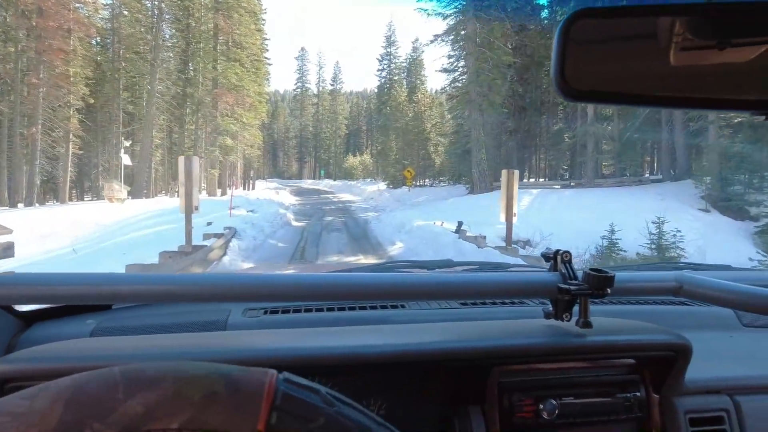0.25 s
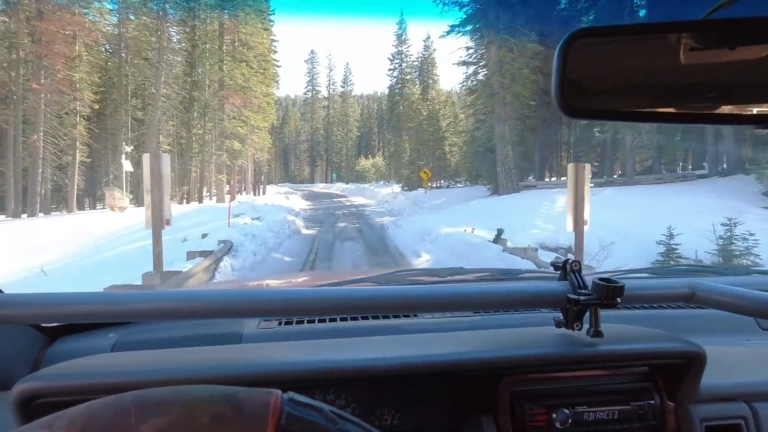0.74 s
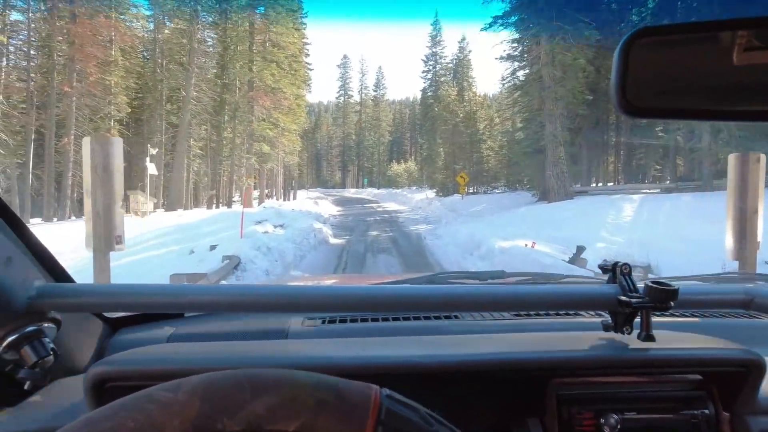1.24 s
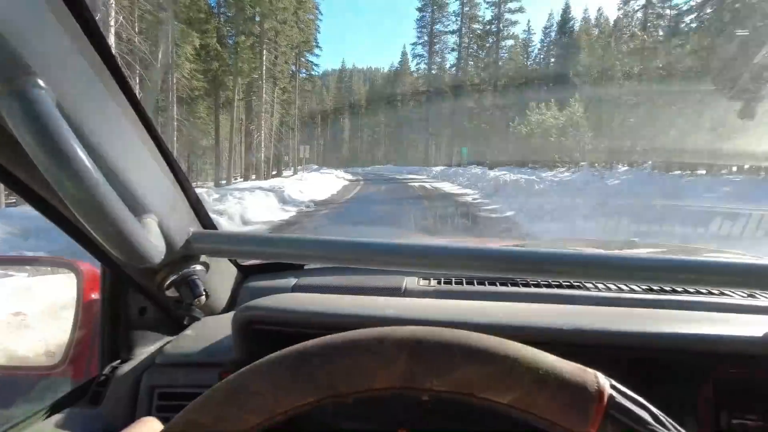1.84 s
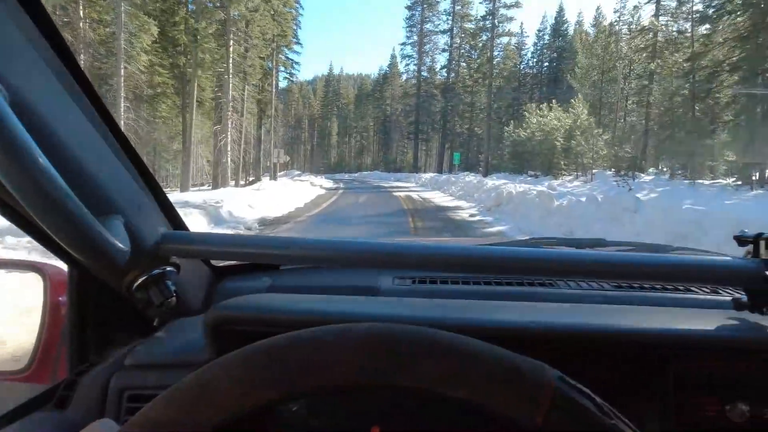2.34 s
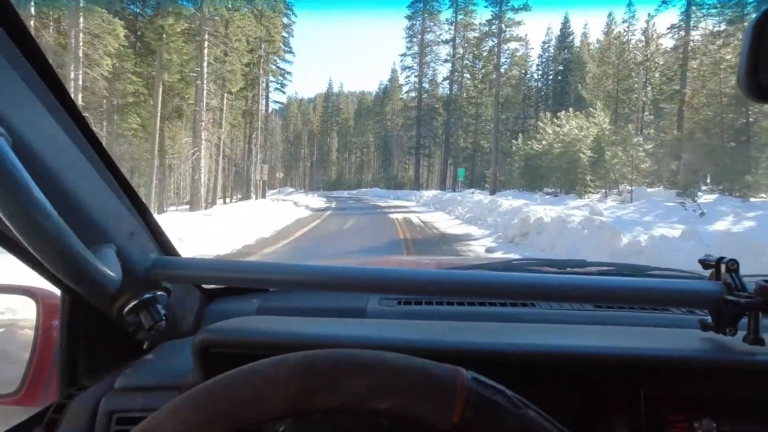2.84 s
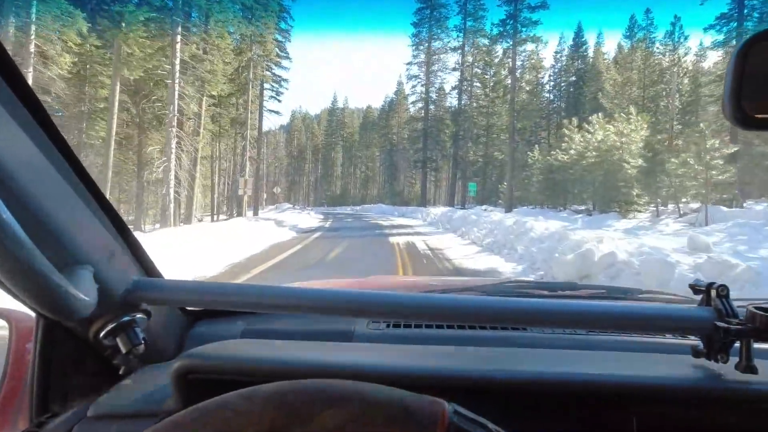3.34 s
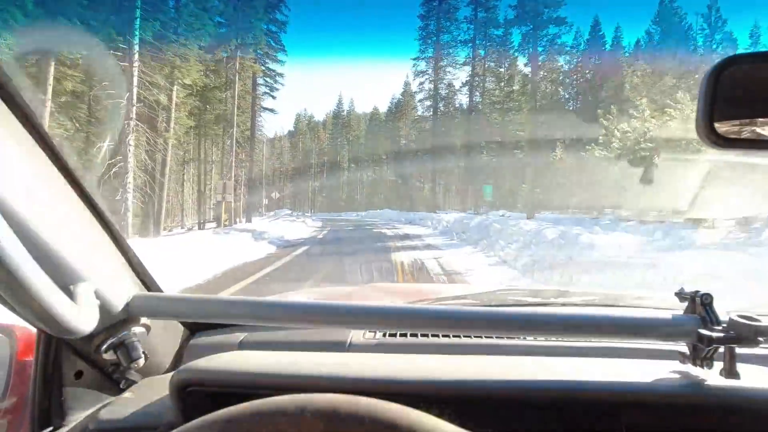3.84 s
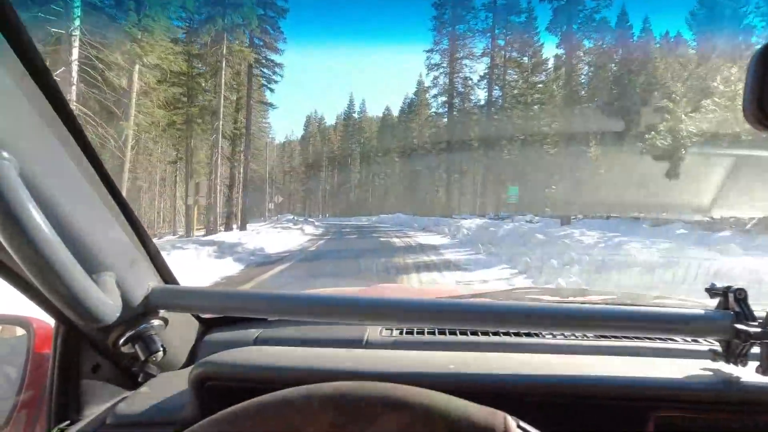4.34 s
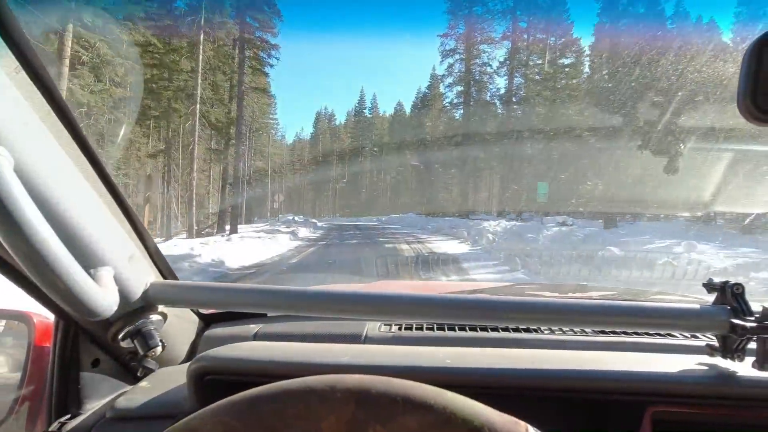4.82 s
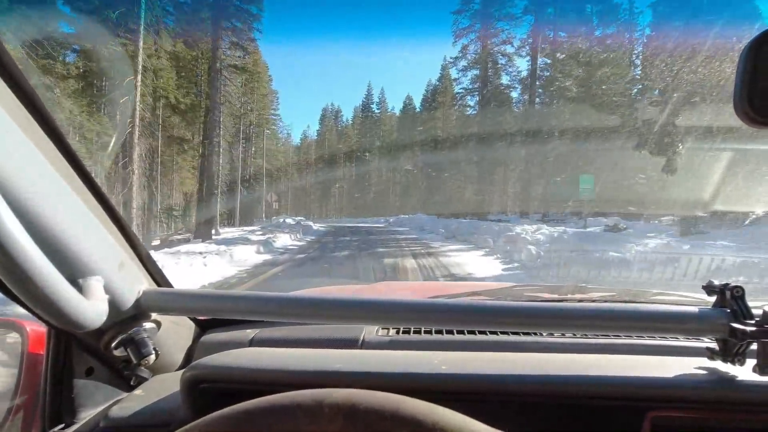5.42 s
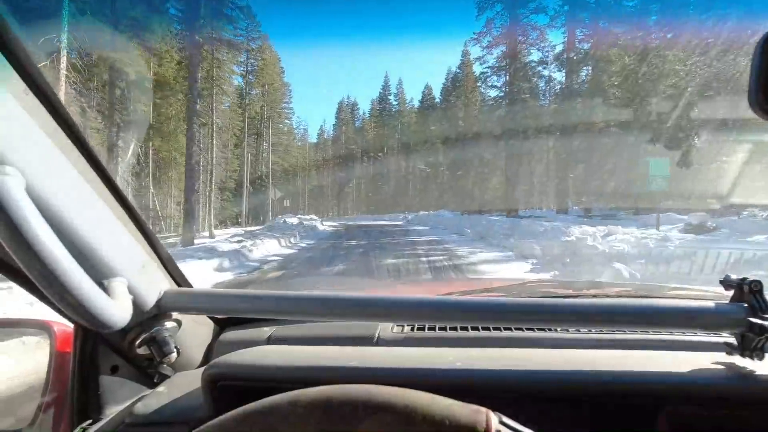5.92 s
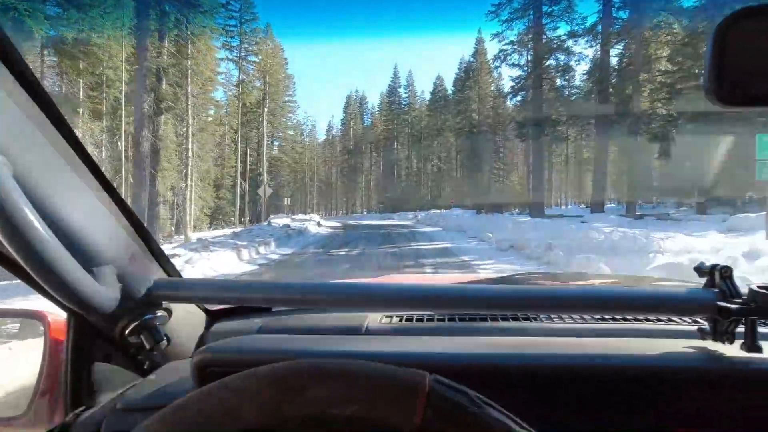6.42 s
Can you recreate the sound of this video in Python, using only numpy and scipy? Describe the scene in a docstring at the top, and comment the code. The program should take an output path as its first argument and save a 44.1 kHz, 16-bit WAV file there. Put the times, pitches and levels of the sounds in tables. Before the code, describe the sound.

Stereo microphones in the cab, close and padded. First, quiet crunchy hiss, low rumble and high squeaks on snow, with a few bumps. Then a sudden switch to pavement: a heavy bump, loud low humming drone surging and dropping, rapid track throbbing, gritty roar, small rattles and floor clunks. The truck speeds up towards the end, and the boom stays strong.

```python
"""Hiss and thin squeaks come first, from inside a truck on rubber snow tracks on packed snow; then the
sound cuts abruptly to the truck on bare paved road, where it gathers speed and the cab booms in swells.
Cleats thump on the road and the drive lugs, three to a cleat, set the cab booming; the engine hums.
Shaped noise makes the rumble, roar, grit and spray; narrow resonances make clunks, buzzes and squeaks.
"""
import sys
import numpy as np
from scipy import signal
from scipy.fft import rfft, irfft, next_fast_len
from scipy.io import wavfile
from scipy.ndimage import uniform_filter1d, map_coordinates

SR = 44100
rng = np.random.default_rng(int(sys.argv[2]) if len(sys.argv) > 2 else 0)


def wrap_up_sound(samples):
    """Save the sound to the file named by the first command line argument, as 16-bit audio."""
    columns = np.atleast_2d(samples).T
    # keep every value between -1 and 1, then stretch to whole-number steps
    tamed = np.clip(columns, -1, 1)
    steps = np.round(tamed * 32767).astype(np.int16)
    wavfile.write(sys.argv[1], SR, steps)


N = 294147

# the sound cuts abruptly from a truck on packed snow to the truck on bare road
ROAD_S, ROAD_RISE_S = 1.335, 0.03


def amp(db):
    """Decibels to gain."""
    return 10 ** (np.asarray(db) / 20)


def unit(x):
    """Scale to rms 1."""
    return x / np.sqrt(np.mean(x ** 2) + 1e-20)


def along(points, hz):
    """Read (f/Hz, value) points on a log frequency axis."""
    f, v = np.transpose(points)
    return np.interp(np.log(hz + 1), np.log(f + 1), v)


def wobble(rate):
    """A smooth random curve, rate knots a second."""
    knots = rng.standard_normal(int(N * rate / SR) + 4)
    return map_coordinates(knots, [np.arange(N) * rate / SR])


def filtered(x, response):
    """Pass x through a complex response of frequency."""
    m = next_fast_len(N + SR // 2)
    return irfft(rfft(x, m) * response(np.fft.rfftfreq(m, 1 / SR)), m)[..., :N]


def spread(pair, response):
    """Colour two unrelated signals and mix them to the two microphones, rms 1."""
    # likeness of the left and right microphones: f/Hz, coherence
    alike = [(60, 0.99), (150, 1), (300, 0.98), (550, 0.97), (1000, 0.86), (2000, 0.32), (4000, -0.26),
             (8000, 0.014), (12000, -0.066)]

    def mix(hz):
        turn = np.arccos(np.clip(along(alike, hz), -1, 1)) / 2
        return response(hz) * np.array([np.cos(turn), np.sin(turn)])

    mid, side = filtered(pair, mix)
    return unit(np.array([mid + side, mid - side]))


def patchy(depth_db):
    """Two noises whose colour shifts from moment to moment."""
    z = signal.stft(rng.standard_normal((2, N)), nperseg=512)[2]
    field = uniform_filter1d(rng.standard_normal(z.shape[1:]), size=5, axis=0)
    field = uniform_filter1d(field, size=10, axis=1)
    return unit(signal.istft(z * amp(depth_db * unit(field)), nperseg=512)[1][:, :N])


def narrow(pitch_hz, width_hz):
    """A fuzzy friction tone at both microphones, rms 1."""
    return spread(rng.standard_normal((2, N)), lambda hz: 1 / (1 + ((hz - pitch_hz) / width_hz) ** 2))


def order(turns, rough, flutter):
    """A line of rms 1 that follows a rotation and flutters in size and phase."""
    sway = 1 + rough * (wobble(flutter) + 1j * wobble(flutter))
    return unit(np.real(sway * np.exp(2j * np.pi * turns)))


def onset(s, rise_s):
    """Rises from 0 to 1, starting at s."""
    return np.clip((np.arange(N) / SR - s) / rise_s, 0, 1)


def swell(s, length):
    """A rounded hump of height 1."""
    return np.abs(np.sin(np.pi * np.clip((np.arange(N) / SR - s) / length, 0, 1))) ** 0.29


def surge(s, length, crest, attack_s, release_s, sag_db):
    """A resonance catches, builds to its crest, sags by sag_db per second squared and lets go."""
    sag = amp(-sag_db * (np.arange(N) / SR - crest) ** 2)
    return onset(s, attack_s) * (1 - onset(s + length - release_s, release_s)) * sag


def bounded_grain(width_hz):
    """A random phasor for a narrow resonance: its size is held in bounds, its phase wanders."""
    grain = wobble(2 * width_hz) + 1j * wobble(2 * width_hz)
    return grain / np.sqrt(1 + np.abs(grain) ** 2)


def rubs(rows, width_hz):
    """Short bouts of shaking or friction, each in a narrow resonance."""
    t = np.arange(N) / SR
    grain = bounded_grain(width_hz)
    out = np.zeros(N)
    for s, length, hz, db in rows:
        tone = unit(np.real(grain * np.exp(2j * np.pi * hz * t)))
        out += amp(db) * swell(s, length) * tone
    return out


def knocks(rows, t60_s, width_hz):
    """Sharp blows, each dying away in a broad resonance."""
    t = np.arange(N) / SR
    grain = bounded_grain(width_hz)
    out = np.zeros(N)
    for s, db, hz in rows:
        decay = amp(db - 60 * np.maximum(t - s, 0) / t60_s)
        tone = unit(np.real(grain * np.exp(2j * np.pi * hz * t)))
        out += decay * onset(s, rise_s=.0015) * tone
    return out


def from_right(x, lag_ms):
    """A wave that reaches the left microphone a little later than the right."""
    sides = np.array([[-1], [1]])
    return filtered(x, lambda hz: np.exp(1j * np.pi * hz * lag_ms / 1000 * sides))


def roughness():
    """Extra dB of rumble, roar, grit and spray as the tracks cross rough, gritty stretches."""
    # rough stretches: middle t/s, width/s, then added rumble/dB, roar/dB, grit/dB, spray/dB
    stretches = [(.2, 0.37, -1, 0, 2, 1), (1.15, 0.19, 0, -2, 2.5, 1.5), (1.7, .3, 1, 1.5, 0.5, 0),
                 (2.17, .09, 1.5, 1.5, 2, 3), (2.69, .05, 1, -0.5, 2, 3), (2.85, 0.7, 1, 0, 1.8, 2.5),
                 (3.33, .06, 0, 0.5, -2, -3), (3.57, 0.14, -1, 6.5, 3.5, 1.5), (4.22, 0.36, 3, 3.5, 4.5, 5),
                 (6.062, 0.11, 3.5, 7, 4, 3), (6.549, 0.12, -1, 4.5, 2.5, 3)]
    t = np.arange(N) / SR
    return sum(np.outer(dbs, np.exp(-((t - s) / width) ** 2)) for s, width, *dbs in stretches)


def squeaks():
    """Dry joints stick and slip, and a bearing whines, each in a narrow band of friction noise."""
    # thin metallic squeals: start t/s, length/s, crest t/s, level/dB
    squeals = [(.24, .27, 0.39, -66), (.95, .215, 1.2, -62.5), (1.19, 0.16, 1.3, -57)]
    # resonances of the squealing joint: f/Hz, width/Hz, relative level/dB
    squeal_modes = [(4930, 70, -1), (7390, 80, -8)]
    # chirps of a dry joint: t/s, length/s, f/Hz, level/dB
    chirps = [(0.005, 0.038, 8700, -51.5), (.43, .03, 7300, -64), (1.074, 0.056, 9940, -60),
              (1.2, 0.081, 9960, -58.5), (1.28, 0.068, 9940, -56), (2.098, 0.05, 9270, -56)]
    # thin whines of a bearing: t/s, length/s, f/Hz, level/dB
    whines = [(1.85, 4.9, 8680, -78), (3.08, .24, 8690, -68)]
    rubbing = sum(amp(db) * surge(s, length, crest, attack_s=0.028, release_s=0.024, sag_db=90)
                  for s, length, crest, db in squeals)
    ringing = sum(amp(db) * narrow(hz, width) for hz, width, db in squeal_modes)
    squeal = rubbing * unit(amp(2.8 * wobble(80))) * ringing
    return squeal + np.array([rubs(chirps, width_hz=170) + rubs(whines, width_hz=56) for _ in range(2)])


def rattle(rate, level_db, width_hz):
    """A loose metal fitting rings from light random taps, and harder when jolted."""
    # resonances of the fitting: f/Hz, relative level/dB
    fitting_modes = [(4450, 2), (7350, -8)]
    # jolts of the fitting: t/s, level/dB, f/Hz
    ticks = [(1.726, -56, 3810), (2.145, -55, 3830), (4.63, -56, 4400), (5.395, -56, 4670)]
    taps = (rng.random((2, N)) < rate / SR) * rng.uniform(0.37, 1, (2, N))
    jolts = np.array([knocks(ticks, t60_s=.1, width_hz=200) for _ in range(2)])
    ring = lambda hz: sum(amp(db) / (1 + 1j * (hz - c) / width_hz) for c, db in fitting_modes)
    return jolts + amp(level_db) * spread(taps, ring)


def panel_buzz():
    """A body panel buzzes in bouts, each in a narrow resonance."""
    # bouts of buzzing: t/s, length/s, f/Hz, level/dB
    buzzes = [(1.4, 0.35, 385, -44.5), (1.82, 0.14, 355.5, -41), (2.1, 4.4, 388, -43.5),
              (2.48, 0.35, 391.7, -44), (3.56, 0.21, 372, -36.5), (3.96, .21, 378, -38.5),
              (4.28, 0.27, 378.3, -37), (4.78, 0.23, 383, -39.5), (5.26, 0.17, 390, -37),
              (5.62, 0.19, 393.6, -37), (6.32, 0.11, 362, -37)]
    return rubs(buzzes, width_hz=24)


def belt_scrubs():
    """The belts scrub on the ground, friction heard in a narrow resonance."""
    # bouts of scrubbing: t/s, length/s, f/Hz, level/dB
    scrub_rows = [(.1, .6, 1033, -58), (.4, 0.32, 790, -53), (3.38, 0.19, 740, -51.5),
                  (4.25, 0.1, 758, -45.5), (6.045, 0.1, 1361, -54), (6.05, 0.19, 885, -49)]
    return rubs(scrub_rows, width_hz=75)


def slush():
    """Grit crackles on the belts and spray hisses on the body in spurts; packed snow adds a hiss."""
    # colour of the grit: f/Hz, relative level/dB per Hz
    grit_colour = [(590, -24), (1000, -2.5), (1230, -8.5), (1340, -6), (1540, -7.5), (2520, -8),
                   (2970, -14), (3930, -8), (4580, -14), (5600, -26.5), (7280, -54.5), (12300, -120)]
    # colour of the fine spray: f/Hz, relative level/dB per Hz
    spray_colour = [(4000, -31), (5300, -3), (7800, -4), (8700, 0.5), (10000, 1.5), (11500, -5.5),
                    (13500, -14), (15500, -17.5)]
    # colour of the snow hiss: f/Hz, relative level/dB per Hz
    snow_colour = [(2500, -24.5), (5500, 1), (7500, 0.5), (10000, -7), (14000, -17)]
    _, _, grit_db, spray_db = roughness()
    spurts = amp(0.8 * wobble(28) + 0.64 * wobble(110))
    stones = (rng.random((2, N)) < 300 / SR) * rng.standard_normal((2, N))
    crackle = patchy(depth_db=1.9) + 0.3 * unit(stones)
    grit = amp(-55 + grit_db) * spread(crackle, lambda hz: amp(along(grit_colour, hz)))
    fine = patchy(depth_db=1.8)
    spray = amp(-66.5 + spray_db) * spread(fine, lambda hz: amp(along(spray_colour, hz)))
    flakes = patchy(depth_db=2.5)
    snow = amp(-71 + grit_db) * spread(flakes, lambda hz: amp(along(snow_colour, hz)))
    return spurts * (grit + spray + (1 - onset(ROAD_S, ROAD_RISE_S)) * snow)


def clunks():
    """A track frame knocks against its stop: a short crack and a dull ring through the floor."""
    # blows of the track frames: t/s, level/dB, f/Hz
    blows = [(.515, -38, 419), (2.79, -41.5, 584), (2.968, -41.5, 568), (3.113, -39.5, 751),
             (3.941, -42, 900), (4.757, -39, 620), (5.694, -40, 535), (5.733, -39, 560),
             (5.959, -39.5, 570), (6.355, -38, 538)]
    crack_db, crack_t60_s, crack_hz = -8, .05, 800  # level against the ring
    t = np.arange(N) / SR
    contact = sum(amp(db - 60 * np.maximum(t - s, 0) / crack_t60_s) * (t > s) for s, db, _ in blows)
    crack = unit(filtered(rng.standard_normal(N), lambda hz: hz / (1 + (hz / crack_hz) ** 3)))
    return knocks(blows, t60_s=0.14, width_hz=170) + amp(crack_db) * contact * crack


def bumps():
    """A bump sets the cab air or the suspension ringing as a decaying sine."""
    # bumps that knock the cab: t/s, level before attack and decay/dB, f/Hz, t60/s
    bump_rows = [(0.237, -24, 147, 0.13), (0.894, -21, 338, 0.04), (0.935, -23.5, 24.3, 0.37),
                 (1.1, -25.5, 136, 0.16), (1.575, -15, 145, 0.2)]
    out = np.zeros(N)
    for s, db, hz, t60 in bump_rows:
        age = np.maximum(np.arange(N) / SR - s, 0)
        attack = (1 - np.exp(-age / 0.005)) ** 2
        out += amp(db - 60 * age / t60) * attack * np.sin(2 * np.pi * hz * age)
    return out


def engine(firings):
    """The engine shakes on its mounts while coasting; under load it hums at twice the firing rate."""
    # swells of the hum under load: start t/s, length/s, crest t/s, level/dB, roughness
    hum_swells = [(1.295, 0.49, 1.62, -33.5, 0.15), (1.7, 1.2, 2.3, -38.5, 0.88),
                  (4.017, 0.49, 4.26, -33, 0.2), (4.563, 1.397, 5.39, -32, 0.12), (6, 0.28, 6.1, -37, 0.5)]
    # engine shake: multiple of the cycle rate, relative level/dB
    shake_orders = [(1, -40), (2, -48), (3, -44), (5, -48.5)]
    cycles = firings / 6
    load = onset(1.37, rise_s=0.27)  # the driver opens the throttle
    hum = np.zeros(N)
    for s, length, crest, db, rough in hum_swells:
        shape = surge(s, length, crest, attack_s=0.17, release_s=0.23, sag_db=11)
        hum += amp(db) * shape * order(2 * firings, rough, flutter=24)
    ragged = load * amp(-48.5) * order(2 * firings, rough=1.5, flutter=30)
    shake = sum(amp(db) * order(k * cycles, rough=.28, flutter=4.1) for k, db in shake_orders)
    return hum + ragged + (.92 - 0.89 * load) * shake


def cab(hz):
    """Resonances of the cab's panels and air; its padding soaks up the treble."""
    # cab resonances: f/Hz, width/Hz, relative level/dB
    cab_modes = [(37.2, 16, 1.5), (52.7, 34, -9.5), (90, 33, -8.5), (141, 27.2, 2), (190.2, 24.8, -2),
                 (225, 40.7, -6), (304, 61, -9.5), (380.4, 60, -6.5), (433, 120, -15)]
    total = 0
    for k, (c, width, db) in enumerate(cab_modes):
        damping = 1j * hz * width
        total = total + (-1) ** k * amp(db) * damping / (c * c - hz * hz + damping)
    return total / (1 + (hz / 620) ** 4)


def rolling(lugs, octaves):
    """Cleat impacts shake the cab, more with speed, and roar in the wheel wells."""
    # rough orders of the cleat rate: multiple, relative level/dB
    cleat_orders = [(4, -5), (9, -11.5), (13, -15.5), (18, -18.5)]
    # colour of the roar on bare road: f/Hz, relative level/dB per Hz
    roar_colour = [(250, -41), (430, 5.5), (490, -1), (545, 6), (590, 0), (635, 2), (690, -4), (745, 1.5),
                   (900, -8.5), (1200, -19.5), (1360, -13), (1600, -33.5), (3000, -52)]
    snow_tilt = [(300, 15.5), (420, -3.5), (500, -3.5), (900, 3.5)]  # added on snow: f/Hz, level/dB
    cushion_hz = 70  # packed snow soaks up the rumble below this
    snow_bite = 0.48  # how hard the cleats strike on snow, against bare road
    rumble_db, roar_db, _, _ = roughness()
    shaking = amp(-35.5 + 16.5 * octaves + rumble_db)  # dB at cruise, dB per octave of speed
    bare = onset(ROAD_S, ROAD_RISE_S)

    cleats = lugs / 3
    slap = 1 + 0.052 * np.cos(2 * np.pi * cleats) + 0.3 * np.cos(2 * np.pi * lugs)
    rumble = spread(slap * rng.standard_normal((2, N)), cab)
    cushioned = filtered(rumble, lambda hz: hz ** 4 / (hz ** 4 + cushion_hz ** 4))
    rumble = bare * rumble + (1 - bare) * cushioned
    bite = snow_bite + (1 - snow_bite) * bare
    lines = sum(amp(db) * order(k * cleats, rough=1.5, flutter=4.5 * k) for k, db in cleat_orders)
    lines = bite * amp(-11.5) * lines

    on_road = spread(slap * patchy(depth_db=2.5), lambda hz: amp(along(roar_colour, hz)))
    snow_response = lambda hz: amp(along(roar_colour, hz) + along(snow_tilt, hz))
    on_snow = spread(patchy(depth_db=1.8), snow_response)
    roar = np.sqrt(bare) * on_road + np.sqrt(1 - bare) * on_snow
    return shaking * (rumble + lines) + amp(-49 + roar_db + 0.62 * wobble(60)) * roar


def thumping(lugs, octaves):
    """Cleats patter at a third of the lug rate, harder with speed, and thump in bouts."""
    # bouts of thumping: t/s, length/s, multiple of the cleat rate, level/dB
    thumps = [(1.77, .08, 1, -30), (2.362, .11, 1, -30), (2.622, .09, 1, -32), (3.3, .1, 1, -26.5),
              (3.727, 0.16, 1, -23.5), (4.108, 0.22, 1, -21.5), (4.603, 0.24, 1, -24),
              (5.162, 0.098, 1, -26), (5.345, 0.39, 1, -26.5), (5.767, 0.15, 1, -26.5),
              (5.97, 0.14, 1, -25.5), (6.361, 0.1, 2, -23.5), (6.534, 0.11, 2, -30)]
    cleats = lugs / 3
    # dB at cruise, dB per octave of speed
    patter = amp(-45.5 + 30 * octaves) * onset(ROAD_S, ROAD_RISE_S)

    def bouts(multiple):
        """Level of the bouts at one multiple of the cleat rate."""
        return sum(amp(db) * swell(s, length) for s, length, k, db in thumps if round(k) == multiple)

    single = np.hypot(bouts(1), patter) * order(cleats, rough=0.3, flutter=22)
    double = np.hypot(bouts(2), amp(3.5) * patter) * order(2 * cleats, rough=1.0, flutter=22)
    return single + double


def drone(lugs):
    """Lugs boom in the cab in swells; an off-centre sprocket makes each throb once a turn."""
    # boom swells: start t/s, length/s, crest t/s, level/dB, throb share
    booms = [(1.622, .22, 1.85, -25, 0.092), (1.835, .155, 1.88, -19, 0.51), (1.98, 0.22, 2.1, -20.5, 0.47),
             (2.175, .32, 2.28, -19, 0.29), (2.477, .11, 2.5, -26.5, 0.62), (2.591, .31, 2.8, -21.5, 0.53),
             (2.895, 0.21, 3.04, -24, 0.35), (3.16, .11, 3.22, -22.5, .1), (3.251, 0.2, 3.34, -19, 0.22),
             (3.441, 0.35, 3.58, -18, .18), (3.931, .73, 4.22, -15.5, 0.13), (4.641, .2, 4.7, -21.5, .4),
             (4.83, .32, 5, -35, .4), (5.13, .11, 5.17, -22, 0.23), (5.225, 0.75, 5.6, -18.5, 0.13),
             (5.949, .2, 6.08, -21.5, 0.44), (6.21, .24, 6.33, -18, 0.24), (6.44, .26, 6.52, -15.5, 0.15)]
    sprocket = lugs / 7  # turns
    tone = order(lugs, rough=.12, flutter=30)
    out = amp(-46) * onset(ROAD_S, ROAD_RISE_S) * tone  # between swells
    for s, length, crest, db, throb in booms:
        turns = sprocket - np.interp(s * SR, np.arange(N), sprocket)  # counted from the start of the swell
        beside = order(lugs + turns, rough=.3, flutter=27)
        shape = surge(s, length, crest, attack_s=0.029, release_s=.035, sag_db=25)
        out += amp(db) * shape * (tone - throb * beside)
    return out


def scene():
    """The belt speed drives the engine and the running gear, all heard in the cab."""
    # rate at which the drive lugs meet the sprocket, and the engine fires: t/s, f/Hz
    speed_points = [(.7, 109.6), (1.3, 104.5), (1.6, 114.1), (2, 116.7), (2.5, 117.2), (3.4, 119.7),
                    (4.2, 124.1), (4.8, 128.1), (5.7, 129.3), (6, 131.3), (6.5, 139)]
    s, hz = np.transpose(speed_points)
    speed = np.interp(np.arange(N) / SR, s, hz)
    lugs = np.cumsum(speed) / SR
    octaves = np.log2(speed / 120)  # against a cruise of 120 lugs a second
    around = squeaks() + rattle(rate=15, level_db=-72.0, width_hz=110) + slush() + rolling(lugs, octaves)
    body = panel_buzz() + belt_scrubs() + clunks() + bumps() + engine(lugs)
    body = body + thumping(lugs, octaves) + drone(lugs)
    return around + from_right(body, lag_ms=0.05)


def record(dry):
    """The microphones keep nothing above their band limit."""
    return filtered(dry, lambda hz: hz < 15700)


dry = scene()
out = record(dry)
wrap_up_sound(out)
```